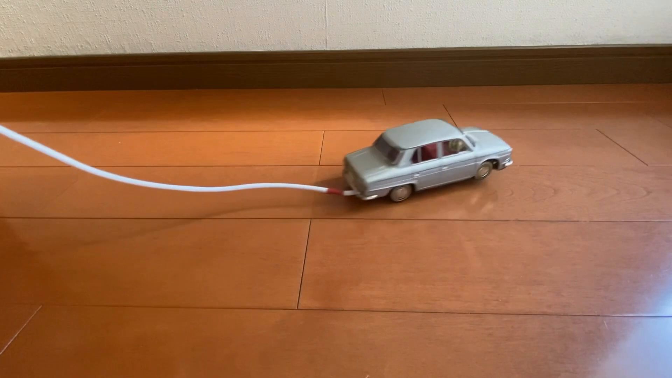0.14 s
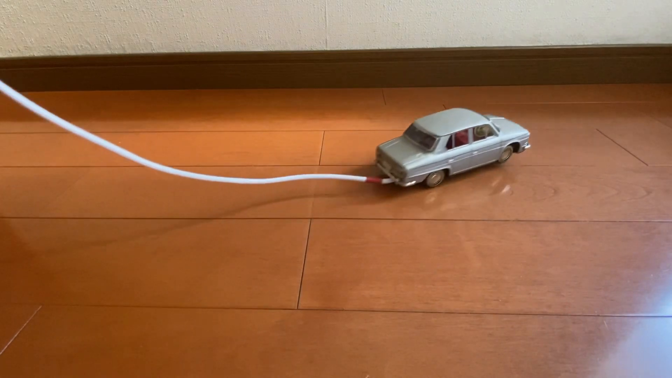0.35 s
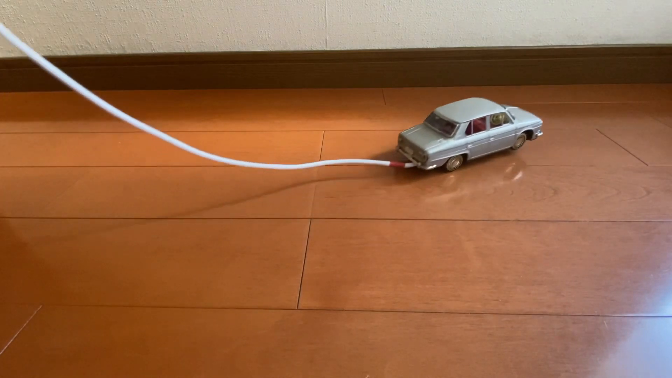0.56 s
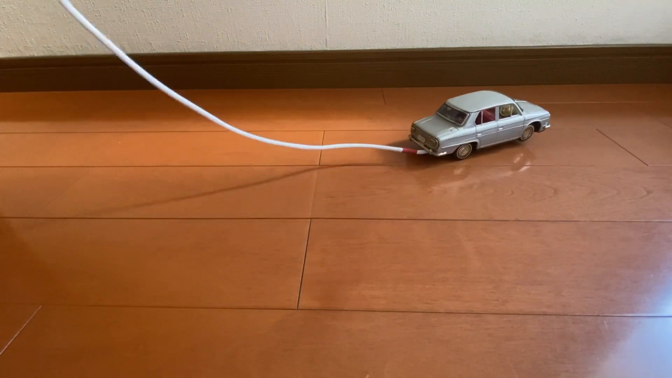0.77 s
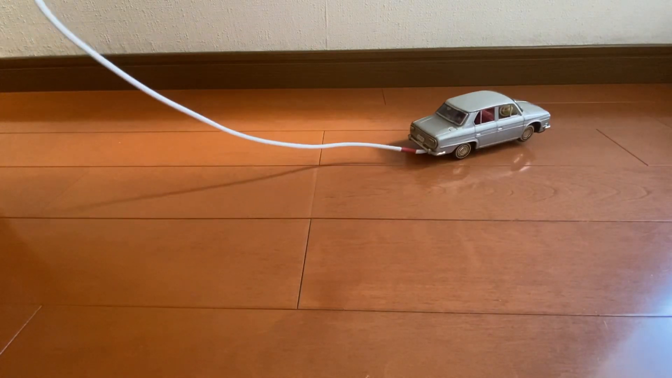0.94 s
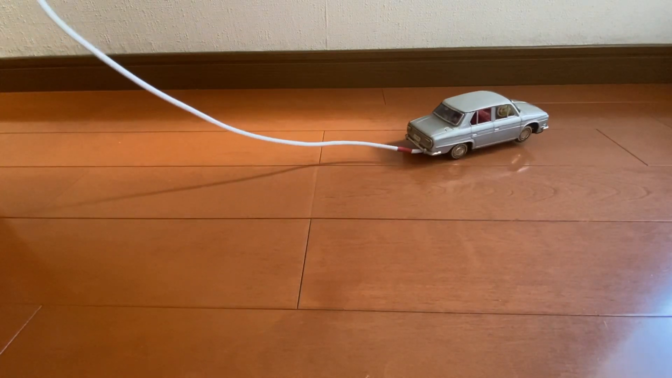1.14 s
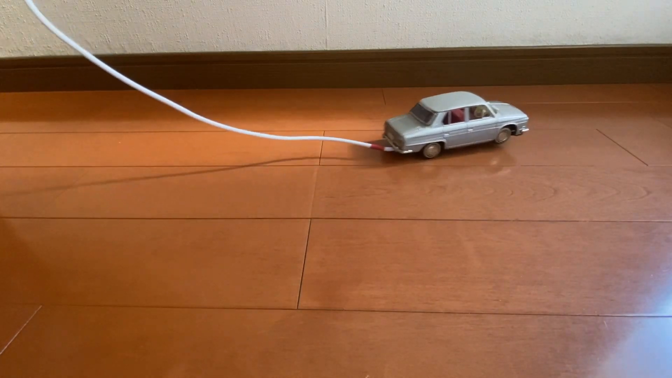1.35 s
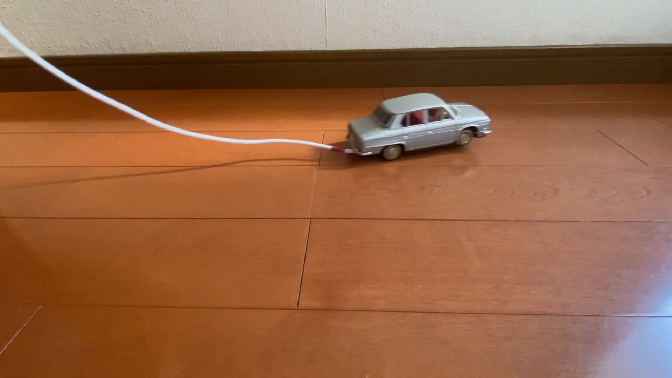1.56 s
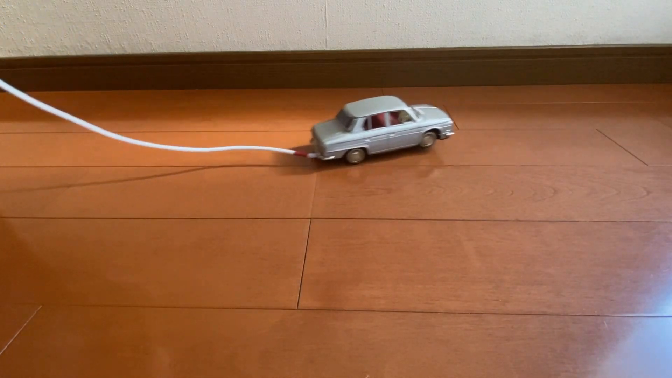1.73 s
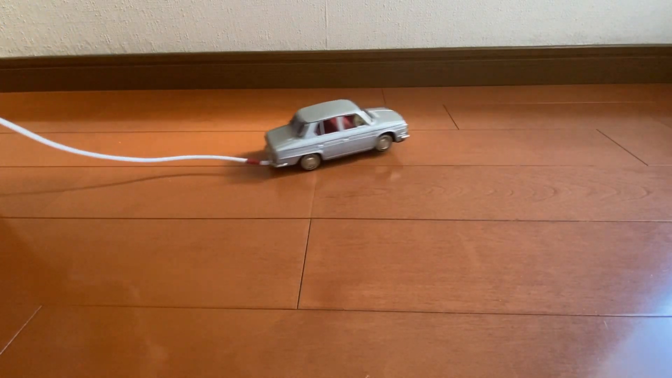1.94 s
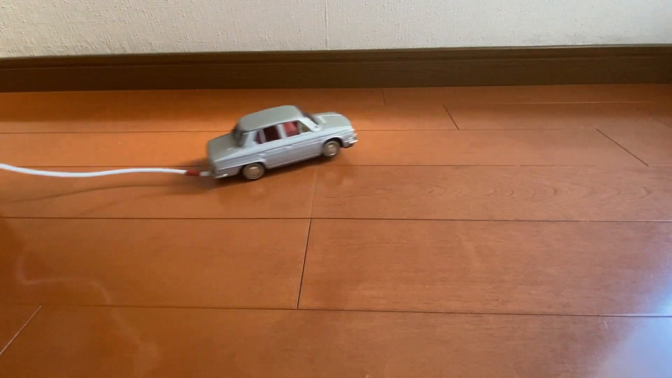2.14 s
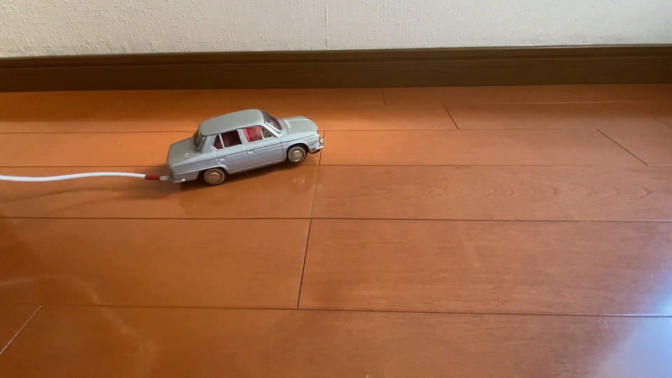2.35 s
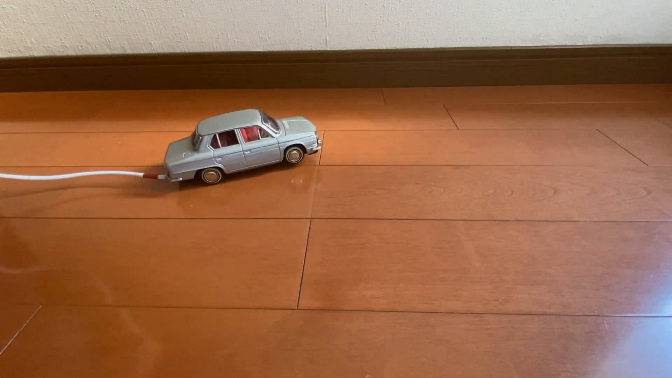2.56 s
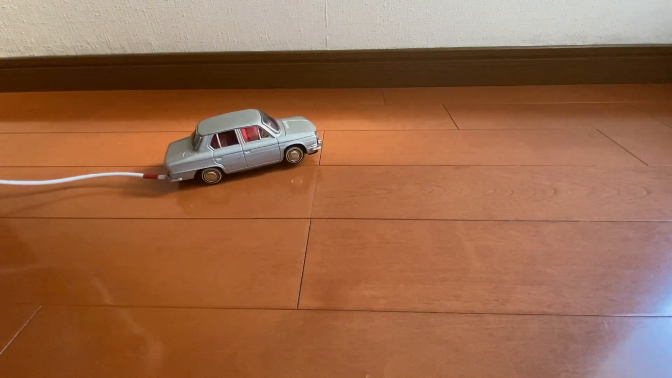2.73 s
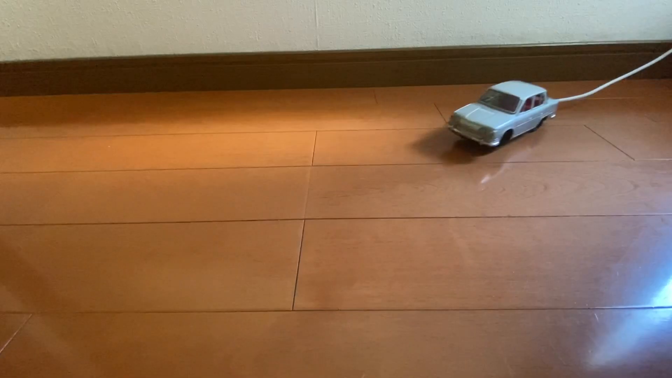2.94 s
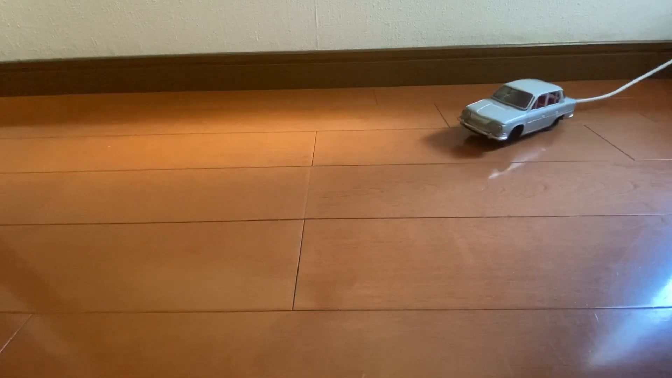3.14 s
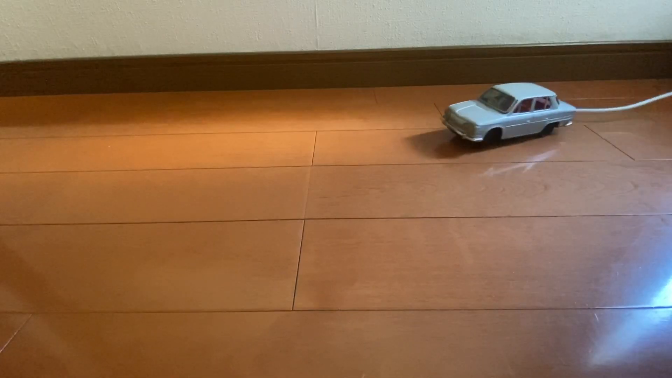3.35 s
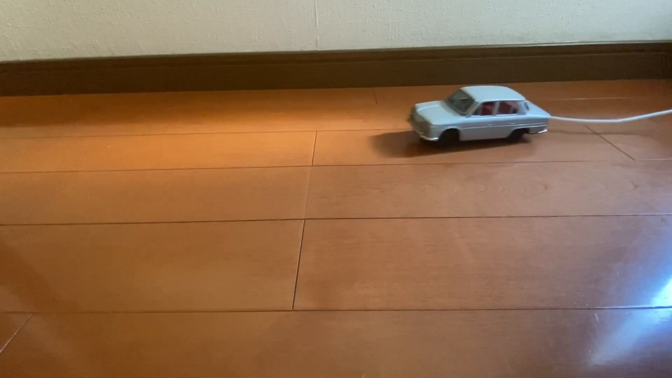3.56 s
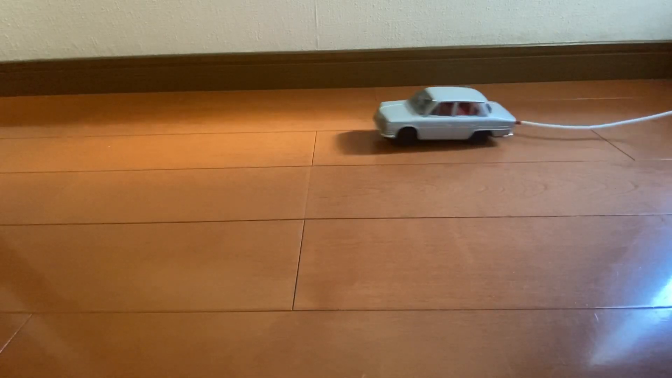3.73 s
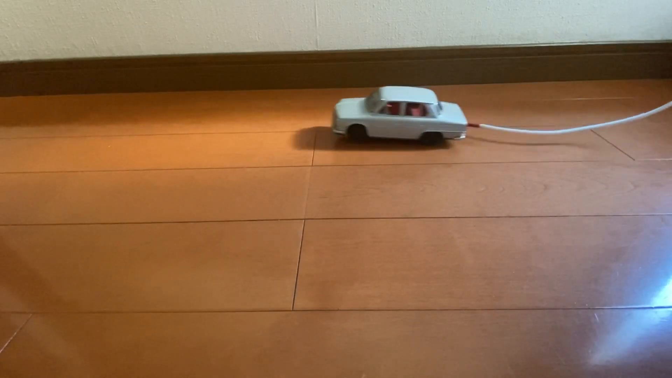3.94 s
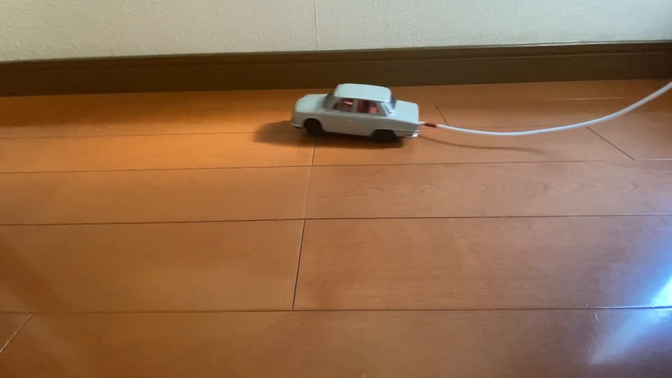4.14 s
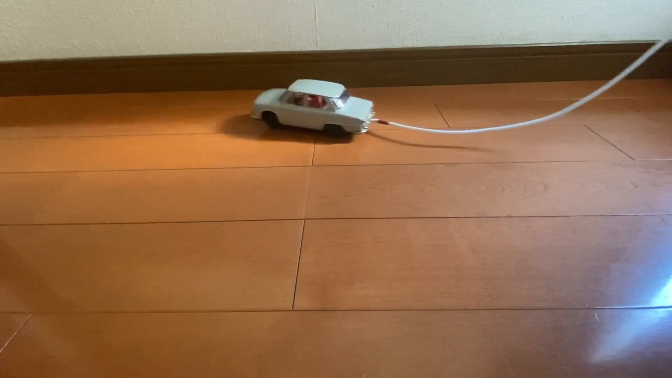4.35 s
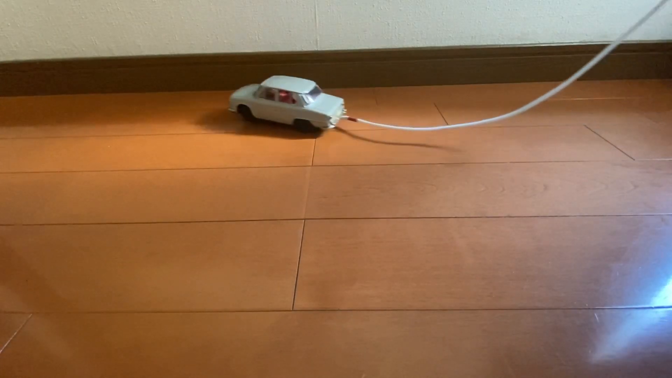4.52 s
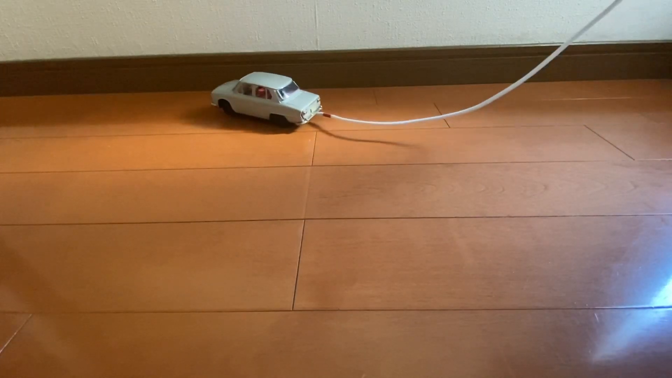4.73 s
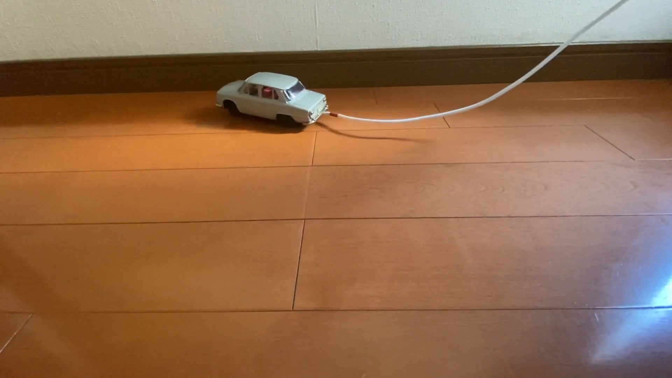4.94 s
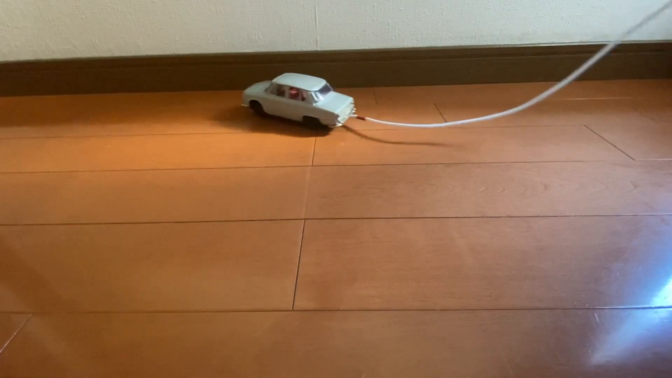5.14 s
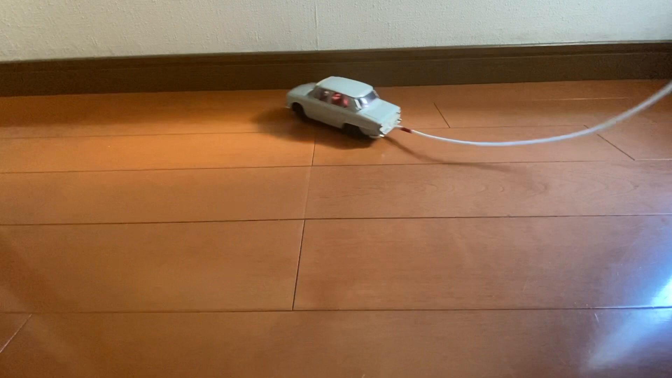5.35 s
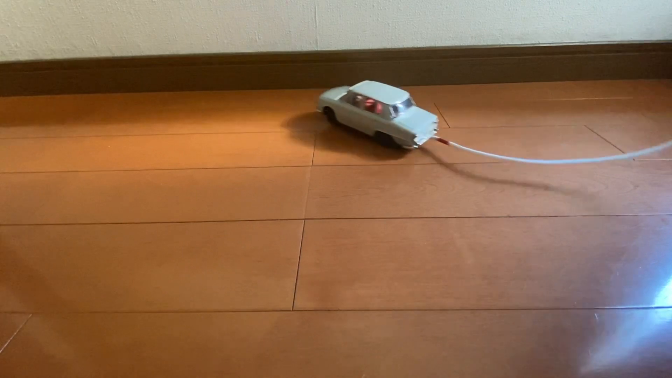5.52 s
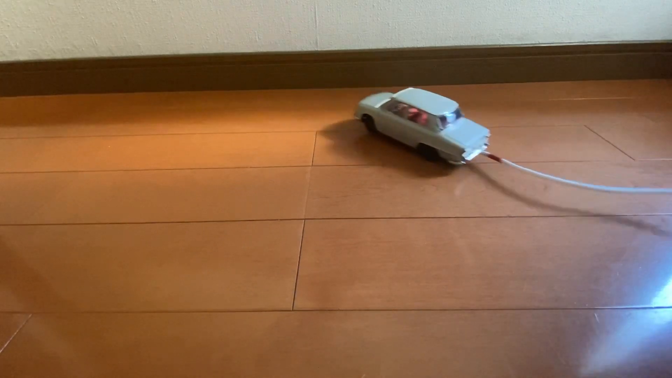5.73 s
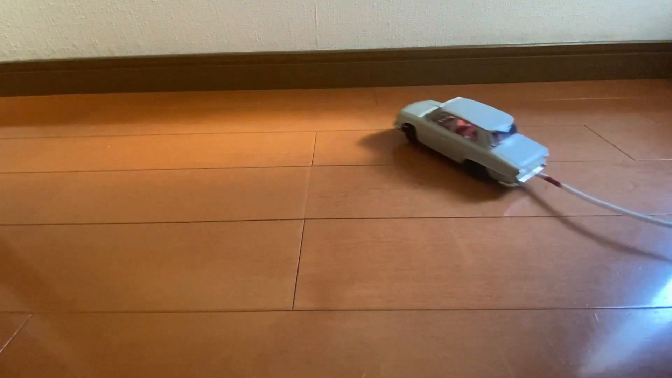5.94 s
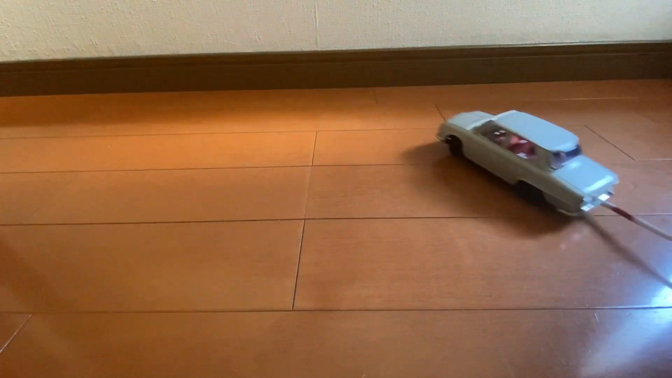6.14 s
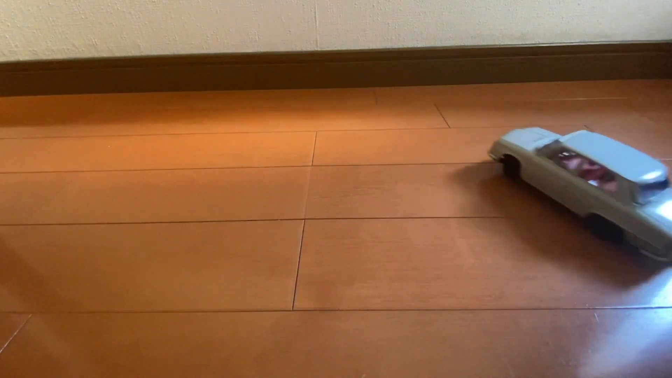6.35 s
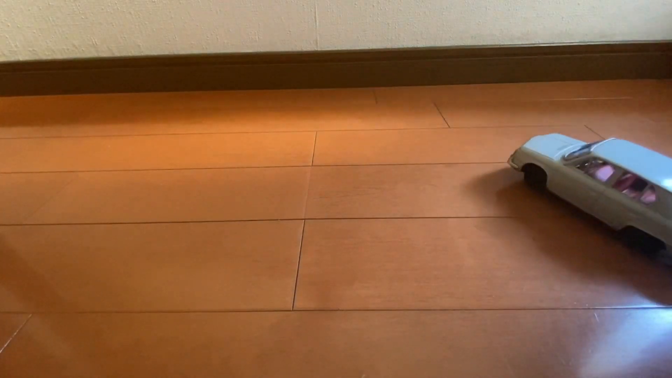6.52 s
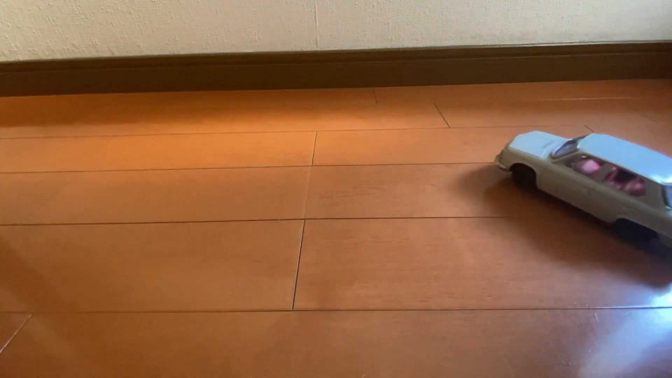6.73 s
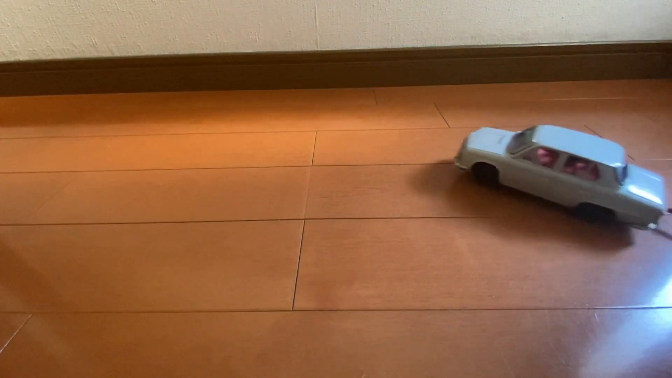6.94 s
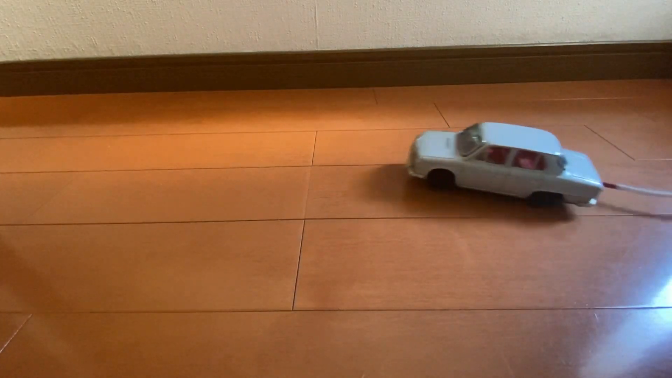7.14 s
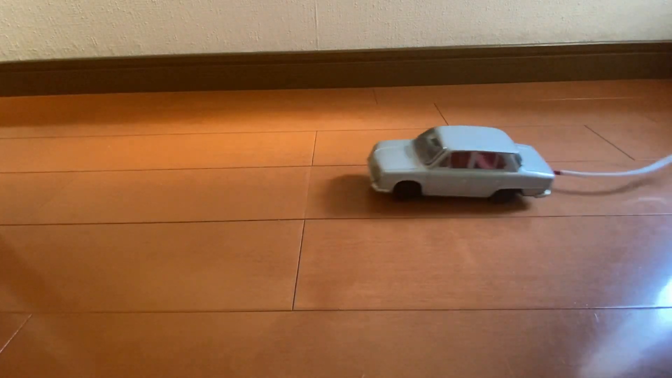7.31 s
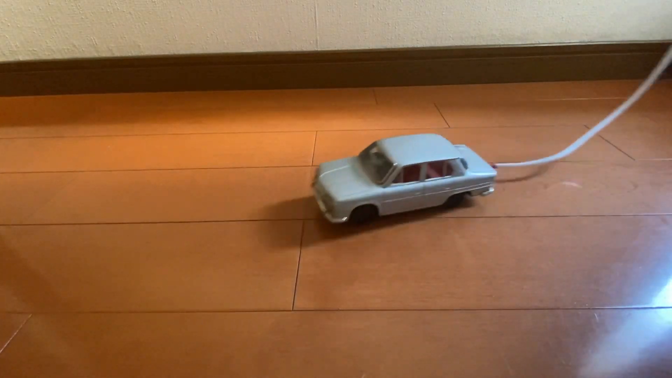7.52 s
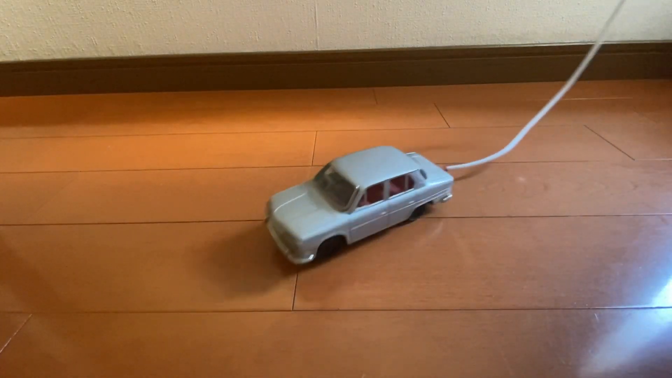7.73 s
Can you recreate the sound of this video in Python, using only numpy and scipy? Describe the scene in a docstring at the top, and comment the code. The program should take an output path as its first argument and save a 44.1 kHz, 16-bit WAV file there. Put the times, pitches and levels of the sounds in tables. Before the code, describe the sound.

A small tin toy car whirs in rough, chattering bursts over a wooden floor, rumbling and ticking, with brief pauses between its forward and reverse runs.

```python
"""Gear chatter and a rough whine come first: a small tin toy car runs on a wooden floor, by two microphones.
On its control cable it shunts forward and back; random tooth knocks ring the modes of its tin body.
Filtered noise makes the floorboards rumble under the wheels, and single blows make them thump.
Tin ticks, a switch clicks, wavering tones squeak like a dry axle, and the chassis thuds.
A small room answers with echoes over a faint background noise."""
import sys
import numpy as np
from scipy import signal
from scipy.fft import rfft, irfft
from scipy.io import wavfile
from scipy.ndimage import uniform_filter1d, map_coordinates

SR = 44100
rng = np.random.default_rng(int(sys.argv[2]) if len(sys.argv) > 2 else 0)


def inscribe(sig):
    """Save sig as 16-bit PCM at rate SR to the path in sys.argv[1].

    A 1-D sig is mono; a 2-D sig holds one channel per row.
    Samples are clipped to [-1, 1] before scaling.
    """
    pcm = np.round(np.clip(np.atleast_2d(sig).T, -1, 1) * 32767)
    wavfile.write(sys.argv[1], SR, pcm.astype(np.int16))


N = 343098
T = np.arange(N) / SR  # seconds


def amp(db):
    """Decibels to gain."""
    return 10 ** (np.asarray(db) / 20)


def unit(x):
    """Scales to an rms of one."""
    return x / np.sqrt(np.mean(x ** 2) + 1e-20)


def read(points, hz, axis=1):
    """One column of a spectrum table, joined on a log-frequency axis."""
    table = np.transpose(points)
    return np.interp(np.log(hz + 1), np.log(table[0] + 1), table[axis])


def level(rows, axis=1):
    """Gain over time from one dB column of a curve."""
    table = np.transpose(rows)
    return amp(np.interp(T, table[0], table[axis]))


def add(mix, s, sound):
    """Mixes a sound in at time s."""
    part = mix[round(s * SR):][:len(sound)]
    part += sound[:len(part)]


def resonance(hz, mode_hz, width_hz):
    """Bell curve of a mode: one at its centre, a half at half its width to either side."""
    return 1 / (1 + (2 * (hz - mode_hz) / width_hz) ** 2)


def colour(x, db_at, size=8192):
    """Causal minimum-phase filter shaped by db_at(Hz): resonances ring after each impact."""
    log_gain = np.log(amp(db_at(abs(np.fft.fftfreq(size, 1 / SR)))))
    spectrum = np.exp(np.conj(signal.hilbert(log_gain)))
    taps = np.fft.ifft(spectrum).real[:size // 2]
    return signal.oaconvolve(x, taps / np.linalg.norm(taps))[:len(x)]


def band(x, low_hz, high_hz, order=4):
    """Band-pass without delay."""
    edges = [low_hz, min(high_hz, SR / 2 - 1)]
    return signal.sosfiltfilt(signal.butter(order, edges, "band", fs=SR, output="sos"), x)


def wobble(rate_hz):
    """Smooth chance up to about a rate, rms one."""
    hz = np.fft.rfftfreq(N, 1 / SR)
    spectrum = rfft(rng.standard_normal(N)) * np.exp(-(hz / rate_hz) ** 2)
    return unit(irfft(spectrum, N))


def impact(ring_s, ring_db, size=2048):
    """A sharp contact and the dense, short ring of thin metal, as decaying noise."""
    t = np.arange(size) / SR
    ring = rng.standard_normal(size) * np.exp(-t / ring_s)
    ring *= amp(ring_db) / np.linalg.norm(ring)
    ring[0] += 1  # the contact
    return ring / np.linalg.norm(ring)


def powered(on, off, rise_s, fall_s, jolt=0):
    """Rises when the power comes on, with a jolt at first; holds, and dies away when it goes off."""
    age = np.maximum(T - on, 0) / rise_s
    first = jolt * np.exp(-age * 5)  # the jolt builds five times faster than the rest
    rise = 1 - first - (1 - jolt) * np.exp(-age)
    return rise * np.exp(-np.maximum(T - off, 0) / fall_s)


def coasting(off, db, db_per_s):
    """Faint motion after the power goes off, fading unless db_per_s is negative."""
    return (T > off) * amp(db - db_per_s * np.maximum(T - off, 0))


# Slow creeping under the first moves. The row: start in seconds, end in seconds, relative chatter
# level in dB, relative rumble level in dB.
CREEPING = (-0.33, 2.5, -56, -53)
# Presses of the control. Each row: on in seconds, off in seconds, whether in reverse, spin-up time
# constant in seconds, chatter in relative dB at first and at last, coasting fade in dB per second,
# rumble in relative dB at first and at last, a moment of wheel thump in seconds, wheel turn in seconds,
# share of the force taken up in the first jolt.
PRESSES = [(0, 0.62, False, 0.00013, -27, -26.5, 124, -27.5, -31, .155, 0.268, .2),
           (1.05, 2.25, True, 0.046, -29, -29, 146, -31.5, -29, 1.2, 0.247, .2),
           (2.861, 2.98, False, 0.00082, -26.5, -46, -3, -33.5, -33, 2.9, 0.21, .2),
           (3.078, 4.623, False, 0.04, -27, -30.5, 40, -28, -29.5, 3.37, 0.27, .03),
           (4.754, 6.378, True, 0.04, -29.5, -28.5, 77, -34.5, -27, 5.01, 0.249, .25),
           (6.569, 7.783, False, 0.033, -26, -29, 0, -27, -30.5, 6.835, 0.258, .1)]


def motion(cut_s=0.028, coast_db=-12.5, gather=1.9, stop_s=0.066):
    """Force on the gear teeth, force of the wheels on the boards, and whether the car is in reverse."""
    start, stop, *creep_db = CREEPING
    teeth, wheels = amp(creep_db)[:, None] * ((T > start) & (T < stop))
    backing = np.zeros(N, bool)
    for (on, off, reverse, spin_up_s, teeth_first_db, teeth_last_db, fade,
         wheels_first_db, wheels_last_db, thump_s, turn_s, jolt) in PRESSES:
        # power off: the teeth unload quickly, then tick over lightly
        run = np.maximum(powered(on, off, spin_up_s, cut_s, jolt), coasting(off, coast_db, fade))
        # the car gathers way more slowly than its motor; the boards tremble on after a stop
        rolling = powered(on, off, spin_up_s * gather, stop_s)
        roll = np.maximum(rolling, coasting(off, db=-26, db_per_s=43))
        # the uneven wheels load the boards once and, very slightly, twice a turn
        angle = 2 * np.pi * (np.minimum(T, off) - thump_s) / turn_s
        throb_db = np.cos(angle) - 0.1 * np.cos(2 * angle)
        teeth_db = np.interp(T, [on, off], [teeth_first_db, teeth_last_db])
        wheels_db = np.interp(T, [on, off], [wheels_first_db, wheels_last_db])
        teeth = np.maximum(teeth, run * amp(teeth_db))
        wheels = np.maximum(wheels, roll * amp(wheels_db + throb_db))
        backing[T > on] = reverse
    return teeth, wheels, backing


def knocks(speed, per_s, spread_db, ring_s, ring_db, count):
    """Irregular, uneven knocks at several contacts, each with its own short ring; sparser at low speed."""
    slots = N // 48
    out = np.zeros(N)
    for _ in range(count):
        at = rng.integers(0, N, slots)
        chance = rng.random(slots)
        size = amp(spread_db * np.minimum(rng.standard_normal(slots), 1.6))
        struck = chance < speed[at] * per_s / count * N / SR / slots
        hits = np.zeros(N)
        hits[at] = struck * size * rng.choice([-1, 1], slots)
        # sparser knocks are each larger here; the force sets the level later
        out += signal.oaconvolve(hits / np.sqrt(speed), impact(ring_s, ring_db, size=512))[:N]
    return unit(out)


def chatter(speed, clack_db=-1.4, clack_hz=3000, rub_db=-13, flutter_db=1.5):
    """Fine chatter of the teeth, slower and duller clacks of backlash, and a faint rub of the shafts."""
    teeth = knocks(speed, per_s=2400, spread_db=3.0, ring_s=0.00082, ring_db=-4.5, count=16)
    clacks = knocks(speed, per_s=110, spread_db=2.5, ring_s=0.0017, ring_db=-5.5, count=6)
    clacks = band(clacks, 1860, clack_hz, order=1)
    rub = rng.standard_normal(N)
    drive = teeth + amp(clack_db) * clacks + amp(rub_db) * rub
    return unit(drive) * amp(flutter_db * wobble(102))


# Modes of the tin body. Each row: frequency in Hz, width in Hz, lift in dB going forward, in reverse.
BODY_MODES = [(285, 17.4, 7, 8.5), (307, 86, 5.5, 8.5), (387, 32, 12, 4), (420, 12, 0, 9.5),
              (491.7, 21, 10.5, 9.5), (526, 53, 8, 1), (633, 53, 9.5, -3), (827, 70, 8.5, 7.5),
              (969, 92, 9, 9), (1047, 130, 9.5, -2), (1075, 126, 3.5, 11.5), (1209, 74, 9, 6.5),
              (1400, 53, 5.5, 9), (1655, 206, 10.5, 9), (1710, 39, -3, -4.5), (1818, 87, 4.5, 6),
              (1894, 240, 5, 6), (2047, 283, 7, 12), (2280, 130, -3, -4), (2413, 80, 2.5, 3),
              (2710, 285, 9.5, 6.5), (2943, 350, 5, 2.5), (3170, 770, 6, 5), (3630, 374, 7, 6.5),
              (4610, 1670, 7.5, 9), (4700, 530, -1, 1), (7540, 1760, 7, 6.5), (8760, 550, 7.5, 6.5)]
# Spectrum of the tooth impacts. Each row: frequency in Hz, level in dB going forward, in reverse.
TOOTH_SPECTRUM = [(60, -37, -38), (197, 2.5, 2), (263, -2.5, -5), (684, -14, -13.5), (1120, -7, -10.5),
                  (2430, -7, -7), (4030, -13, -14), (6280, -7.5, -6.5), (9100, -13, -10.5),
                  (10800, -5.5, -7.5), (11900, -7, -9.5), (13100, -21, -22), (14800, -8, -8.5)]


def tin_db(hz, gear):
    """Response of the body; forward and reverse press on other tooth flanks and favour other modes."""
    modes = sum(row[2 + gear] * resonance(hz, row[0], row[1]) for row in BODY_MODES)
    return read(TOOTH_SPECTRUM, hz, axis=1 + gear) + modes


# Bands of the body that swell and sink. Each row: low edge in Hz, high edge in Hz.
BODY_BANDS = [(180, 344), (440, 740), (900, 1140), (1130, 1500), (1750, 2120), (2450, 3200)]
# How strongly they ring as the car moves about. Each row: time in seconds, then the change
# in dB for each of the six bands from low to high.
BODY_BAND_LEVELS = [(0.0, -9.5, 7.5, -3, 2, -3.5, 1), (0.3, -4.5, 10, 0.5, 3, 1.5, -4),
                    (0.75, -1, 3.5, -9, 2.5, 0.5, -4.5), (1.05, -4, 10.5, 2.5, 1, -3, -1),
                    (1.6, -0.5, 7, 2.5, 1, -0.5, 2), (2.05, -5.5, -1, 3, 7, -3.5, 2),
                    (2.25, 1, 7.5, 7, 2, -0.5, -4), (2.37, -7, -5, 0, 3, -11, -5),
                    (2.5, -7, -3, 0, 5, -18, -2), (2.8, -0.5, 9.5, -2, 3, -2, -1.5),
                    (3.4, -1.5, -4, -3, -1, 3.5, -4), (3.55, -0.5, 5.5, 4, -1.5, -1.5, -4.5),
                    (4.15, 6.5, 9, -1, 2.5, 0, 0), (4.35, 1.5, -0.5, 3, 1.5, 0.5, 1),
                    (4.6, 0, 0, -3.5, 8.5, 3.5, -6), (4.85, 2.5, 4.5, 3, 5, -2.5, -1.5),
                    (5.25, -0.5, 5.5, 3, 8, -1.5, 1), (5.6, 0.5, 14, 5, -0.5, -2.5, -2),
                    (6.3, -9.5, 6.5, 6.5, 5, -1, -3), (6.45, -13, -1, -2.5, 4, 4.5, -2),
                    (6.7, -4.5, -3.5, -2, 1, -3, -7), (7.35, -7, 9, 1, 3, -1, 0.5),
                    (7.78, -5, 8.5, -4, 3.5, -1, 0)]


def gears(force, backing, chatter_db=1.97, dull_below_db=-36, slowest=0.11, slowing=0.97, dulling=0.35):
    """The chatter rings the body; knocks of a coasting motor are sparser and duller."""
    effort = np.minimum(force / amp(dull_below_db), 1)
    # knock rate as a share of the full rate
    drive = chatter(np.maximum(effort ** slowing, slowest))
    forward, backward = (colour(drive, lambda hz: tin_db(hz, gear)) for gear in (0, 1))
    body = np.where(backing, amp(-0.68) * backward, forward)
    for k, (low_hz, high_hz) in enumerate(BODY_BANDS):
        change = level(BODY_BAND_LEVELS, axis=k + 1) - 1
        body = body + change * band(body, low_hz, high_hz, order=2)
    # light knocks lose treble
    body = body - (1 - effort ** dulling) * band(body, 6400, 19000, order=1)
    return amp(chatter_db) * force * body


# Note of the meshing gears. Each row: time in seconds, pitch in Hz, level in dB relative to the chatter's
# force, for forward moves.
GEAR_NOTE = [(0, 1012, -3.5), (0.18, 1008, -7.5), (0.3, 1020, -11), (0.63, 1035, -16), (3.1, 1040, -23),
             (3.23, 1038, -4.5), (3.548, 1020, -6.5), (3.75, 995, -7), (4.35, 995, -6.5),
             (4.601, 1060, -16), (6.6, 1045, -16), (7.0, 1038, -8.5), (7.392, 1028, -8.5),
             (7.7, 1000, -9.5)]


def whine(force, backing, whine_db=-1, octave_db=-22, reverse_hz=1196, reverse_db=-17, rough_db=2.5):
    """Meshing teeth sing a rough note forward, a fainter, higher one in reverse, and an octave in both."""
    times, pitch_hz, _ = np.transpose(GEAR_NOTE)
    hz = np.interp(T, times, pitch_hz)

    def rough_tone(pitch, share):
        """A unit-rms sine whose pitch wavers by a share of itself."""
        wavering = pitch * (1 + share * wobble(90.6))
        return np.sqrt(2) * np.sin(2 * np.pi * np.cumsum(wavering) / SR)

    forward = amp(whine_db) * level(GEAR_NOTE, axis=2) * rough_tone(hz, 0.02485)
    octave = amp(octave_db) * rough_tone(2 * hz, 0.0162)
    reverse = amp(reverse_db) * rough_tone(reverse_hz, 0.0201)
    tone = np.where(backing, reverse, forward)
    return force * (tone + octave) * amp(rough_db * wobble(120))


# Boom of the floorboards. Each row: frequency in Hz, relative level in dB.
BOARD_BOOM = [(25, -80), (48, -38), (62, -19), (72, -5), (79, 3), (90, -2), (106, 2), (126, -15.5),
              (149, -8.5), (180, -23.5), (260, -30.5), (500, -72)]


def rumble(force, rumble_db=-1.0, steadiness=0.37, apart_db=-12.5):
    """The wheels shake the floorboards, whose low modes boom with a fairly even swing."""
    boom = colour(rng.standard_normal(N), lambda hz: read(BOARD_BOOM, hz))
    swing = np.sqrt(uniform_filter1d(abs(signal.hilbert(boom)) ** 2, size=2600))
    even = unit(boom / swing ** steadiness)
    # only the shorter waves differ between the microphones
    apart = amp(apart_db) * unit(band(rng.standard_normal(N), 79, 160, order=2))
    return amp(rumble_db) * (even + np.array([apart, -apart])) * force


# Background of the quiet room. Each row: frequency in Hz, relative level in dB.
ROOM_HUSH = [(20, -18), (80, 0), (160, -7), (300, -7), (550, -16), (1100, -13), (3000, -19), (8000, -24),
             (15000, -27)]


def stillness(quiet_db=-61, apart=1.0):
    """Faint background noise of the room, partly shared by both microphones."""
    shared, left, right = (colour(rng.standard_normal(N), lambda hz: read(ROOM_HUSH, hz)) for _ in range(3))
    return amp(quiet_db) * unit(shared + apart * np.array([left, right]))


# The hardest blows of the wheels on the boards. Each row: start in seconds, relative level in dB.
WHEEL_THUMPS = [(0.128, -23), (0.409, -21), (0.656, -26.5), (1.363, -23), (1.68, -25), (1.753, -29),
                (1.919, -32), (2.165, -26), (2.262, -25), (3.22, -22), (3.336, -22.5), (3.631, -20.5),
                (3.812, -25), (3.884, -33), (4.154, -20), (4.239, -23), (5.246, -21.5), (5.495, -25),
                (5.783, -21.5), (5.91, -24), (5.984, -18), (6.234, -18), (6.354, -31), (6.677, -19),
                (6.811, -20), (7.081, -19), (7.322, -19), (7.395, -22), (7.587, -18)]


def thumps(thump_db=29.0, board_hz=84, width_hz=24, lift_db=9):
    """A wheel drops on the boards and sets a low mode swinging."""
    blows = np.zeros(N)
    for s, db in WHEEL_THUMPS:
        add(blows, s, [amp(db + thump_db)])
    return colour(blows, lambda hz: read(BOARD_BOOM, hz) + lift_db * resonance(hz, board_hz, width_hz))


# Sharp ticks of the tin and gears. Each row: start in seconds, relative level in dB, relative treble
# in dB, ring decay in seconds.
TIN_TICKS = [(0.148, -38, -15, 0.00091), (0.2318, -20.5, 3, 0.0034), (0.52, -16.5, -10, 0.0046),
             (0.6571, -21, -5, 0.0042), (0.861, -41, -21, 0.0097), (1.068, -31, -12, 0.0047),
             (1.0953, -29, -9, .003), (1.1805, -16.5, -4, 0.0028), (1.6092, -20, -3, .002),
             (1.7886, -26, -17, 0.0017), (2.862, -22, -11, .008), (2.879, -26, -11, .009),
             (2.896, -11, -9, .005), (2.9013, -21, -26, 0.0038), (3.927, -18.5, -20, 0.0028),
             (4.367, -17.5, -13, 0.0036), (4.815, -22.5, 6, .003), (4.8647, -20, 14, .002),
             (5.252, -17, -1, 0.0025), (5.3794, -20, -3, 0.0022), (5.728, -37, 0, 0.0016),
             (5.7505, -19, -10, 0.0023), (5.783, -21, 1, 0.0026), (5.81, -19.5, 9, 0.0031),
             (5.9674, -19, 11, 0.0023), (5.985, -17, 13, .005), (6.2344, -15, 19, 0.0084),
             (6.254, -14.5, 12, 0.0068), (6.3831, -15, 15, 0.003), (6.401, -24.5, -36, 0.0036),
             (6.5623, -31, -2, 0.0033), (7.1021, -18.5, 0, 0.0027), (7.2, -22, -3, 0.0024),
             (7.316, -19, -6, 0.0023), (7.327, -17, -10, 0.0063), (7.687, -18, 4, 0.0022)]


def ticks(tick_db=21, bright_db=10):
    """Single hard knocks in the same tin body."""
    out = np.zeros(N)
    for s, db, treble_db, ring_s in TIN_TICKS:
        tilt_db = treble_db + bright_db
        knock = colour(impact(ring_s, ring_db=14), lambda hz: tin_db(hz, 1) + tilt_db * hz / (hz + 4000))
        add(out, s, amp(db + tick_db) * knock)
    return out


# A dry axle as the car comes to rest. Each row: peak in seconds, swell in seconds, pitch in Hz,
# relative level in dB, pitch waver as a share.
AXLE_SQUEAKS = [(0.675, 0.06, 4600, -35, 0.08), (0.853, 0.03, 1865, -45, 0.006),
                (0.94, .013, 3520, -57, .012), (1.004, 0.03, 1410, -40.5, 0.006),
                (1.03, .011, 3490, -55, .01), (2.375, .035, 1194, -46, .025)]


def squeaks(rough_db=4.5, arch=0.0086):
    """Short, unsteady tones of an axle slipping in its bearing; each swells and fades on an arch of pitch."""
    out = np.zeros(N)
    unsteady, grip = wobble(226), amp(rough_db * wobble(110))
    for s, swell_s, hz, db, waver in AXLE_SQUEAKS:
        swell = np.exp(-((T - s) / swell_s) ** 2)
        # the pitch sags by the arch's share at the flanks
        pitch = hz * (1 + waver * unsteady - arch * (1 - swell))
        out += amp(db) * swell * grip * np.sin(2 * np.pi * np.cumsum(pitch) / SR)
    return out


# The direction switch. Each row: start in seconds, relative level in dB, ring decay in seconds.
SWITCH_CLICKS = [(2.5245, -45, .006), (2.529, -42, 0.004), (2.535, -29, 0.0016), (2.538, -33.5, .0015),
                 (2.5415, -33, .002), (2.551, -36.5, 0.014)]
# Spectrum of its click. Each row: frequency in Hz, relative level in dB.
CLICK_SPECTRUM = [(200, -31), (600, -17), (1050, -5), (2000, 0), (2800, -3), (3900, -6.5), (8000, -12),
                  (16000, -31)]
# Modes of its case. Each row: frequency in Hz, width in Hz, lift in dB.
CASE_MODES = [(1180, 300, 8), (2670, 560, 5.5), (3100, 300, 0)]


def switch(switch_db=23, case_db=-15, case_s=0.044):
    """The lever scrapes and snaps over; its case rings on faintly."""
    out = np.zeros(N)
    for s, db, ring_s in SWITCH_CLICKS:
        click = impact(ring_s, ring_db=11)
        case = impact(case_s, ring_db=24, size=14000)
        add(out, s, amp(db + switch_db) * click)
        add(out, s, amp(db + switch_db + case_db) * case)

    def case_response(hz):
        """The click's spectrum raised at the modes of the case, in dB."""
        return read(CLICK_SPECTRUM, hz) + sum(db * resonance(hz, mode, width) for mode, width, db in CASE_MODES)

    return colour(out, case_response)


# Chassis thuds as the wheels jolt. Each row: start in seconds, relative level in dB, favoured Hz.
CHASSIS_BUMPS = [(2.895, -38, 296), (3.628, -32, 172), (3.889, -36, 280), (4.147, -31, 230),
                 (4.158, -40, 560), (4.581, -32.5, 298), (4.69, -41, 290), (6.182, -38, 526)]
# Spectrum common to the thuds. Each row: frequency in Hz, relative level in dB.
THUD_SPECTRUM = [(60, -33), (150, -5), (300, 4.5), (550, -5), (800, -37), (3000, -45)]


def bumps(bump_db=29, favour_db=14, width_hz=130):
    """Dull jolts, each ringing its own part of the chassis."""
    out = np.zeros(N)
    for s, db, mode_hz in CHASSIS_BUMPS:
        jolt = impact(ring_s=0.0096, ring_db=17, size=6000)
        thud = colour(jolt, lambda hz: read(THUD_SPECTRUM, hz) + favour_db * resonance(hz, mode_hz, width_hz))
        add(out, s, amp(db + bump_db) * thud / np.linalg.norm(thud))
    return out


# Place of the car. Each row: time in seconds, lag of the left microphone in milliseconds.
CAR_PLACE = [(0, 0.0072), (1.2, 0.038), (1.75, -0.025), (2.3, -0.24), (2.6, -0.19), (2.85, 0.13),
             (3.7, 0.07), (4.25, 0.03), (4.75, -0.13), (5.2, -0.12), (5.75, -0.044), (6.25, -0.033),
             (6.7, 0.21), (7.2, 0.087), (7.78, -0.034)]


def microphones(x):
    """The sound reaches the nearer microphone first."""
    lag = np.interp(T, *np.transpose(CAR_PLACE)) * SR / 1000  # samples
    return np.array([map_coordinates(x, [np.arange(N) + side * lag / 2], order=5) for side in (-1, 1)])


# Reverberation of the room. Each row: frequency in Hz, time to fall by 60 dB in seconds.
ROOM_DECAY = [(100, 0.63), (600, 0.55), (1700, 0.51), (4600, 0.44), (9000, 0.28), (16000, 0.25)]


def room(x, wet_db, early_db, early_s=0.0061, shared=0.068, size=12000):
    """Floor and wall throw back early echoes, then a short tail; each microphone gets its own."""
    taps = rng.standard_normal((2, size)) * (rng.random((2, size)) < 3000 / SR)
    age = np.arange(size) / SR
    early = taps[:, ::-1] * np.exp(-age / early_s) * (age > .001)
    # the tail decays at its own pace at each frequency
    hz, t, z = signal.stft(taps * (age > .008), SR, nperseg=256)
    decay = np.exp(-np.log(1000) * t / read(ROOM_DECAY, hz)[:, None])
    tail = signal.istft(z * decay, SR)[1][:, :size]
    echoes = sum(amp(db) * part / np.linalg.norm(part, axis=1, keepdims=True)
                 for db, part in [(early_db, early), (wet_db, tail)])
    # long waves reach both microphones more alike
    echoes = echoes - shared * band(echoes - echoes.mean(0), 37, 1400, order=1)
    return signal.oaconvolve(x[None], echoes, axes=1)


def moving_room(x, size=5500):
    """The echo pattern changes as the car rolls about: overlapping stretches each get fresh echoes."""
    heard = np.zeros((2, N + size))
    fade = np.sqrt(signal.windows.hann(2 * size, sym=False))
    padded = np.pad(x, (size, 2 * size))
    for start in range(0, N + size, size):
        echoes = room(padded[start:start + 2 * size] * fade, wet_db=-5.0, early_db=-1.5)
        for channel, sound in zip(heard, echoes):
            add(channel, start / SR, sound)
    return heard[:, size:]


def scene(floor_lift=0.4, low_echo_loss=0.22, squeak_echo_db=-9, whine_echo_db=-9):
    """Car, boards and switch in a small room; the floor adds to the car's direct long waves."""
    teeth, wheels, backing = motion()
    car = gears(teeth, backing) + ticks() + bumps()
    note, axle, lever = whine(teeth, backing), squeaks(), switch()
    low = band(car, 120, 1700, order=1)
    near = amp(-6.5) * (car + floor_lift * low + axle) + note
    direct = microphones(near) + amp(-5.0) * lever
    sent = car - low_echo_loss * low + amp(squeak_echo_db) * axle + amp(whine_echo_db) * note
    echoes = moving_room(sent) + room(lever, wet_db=-6.5, early_db=-2.5)[:, :N]
    return direct + echoes + rumble(wheels) + thumps() + stillness()


def record(dry, edge_hz=15950):
    """The recorder's band limit: a steep low-pass."""
    taps = signal.firwin(511, edge_hz, window=("kaiser", 9), fs=SR)
    return signal.oaconvolve(dry, taps[None], "same")


dry = scene()
out = record(dry)
inscribe(out)
```